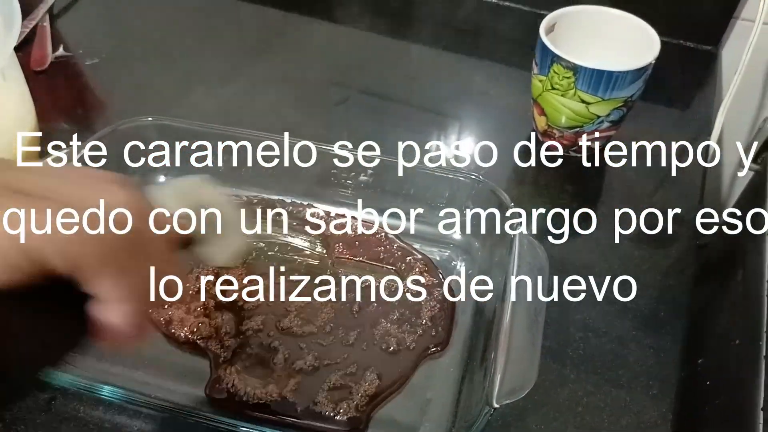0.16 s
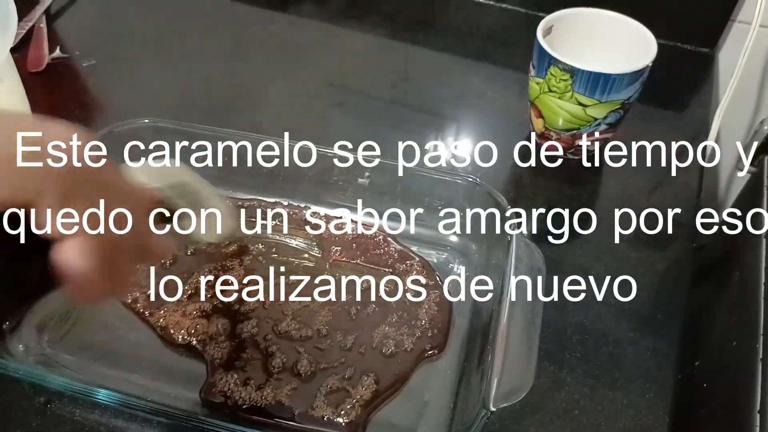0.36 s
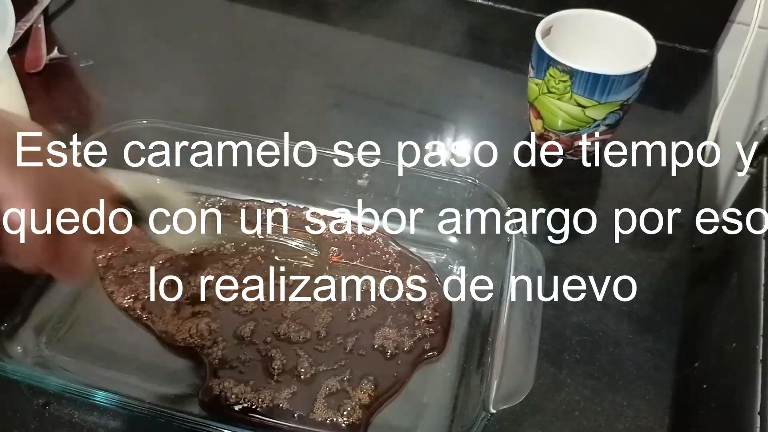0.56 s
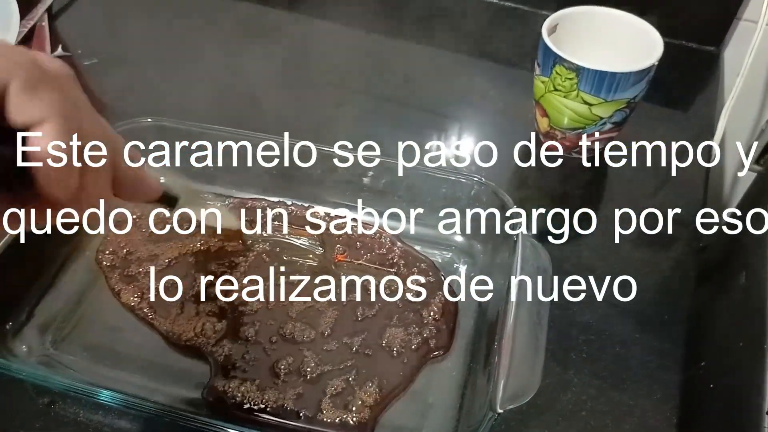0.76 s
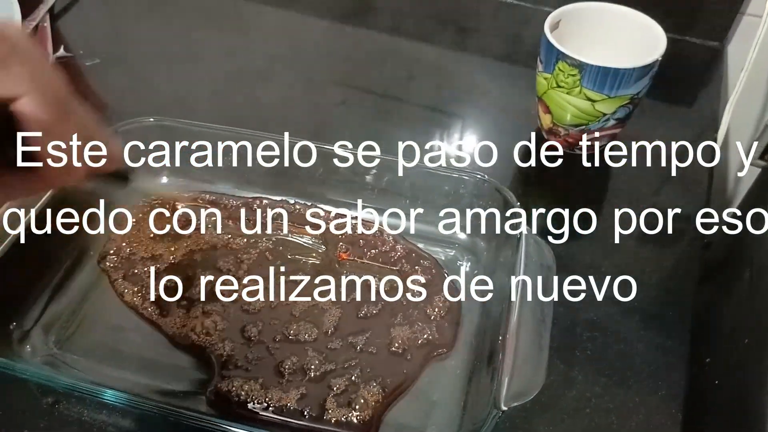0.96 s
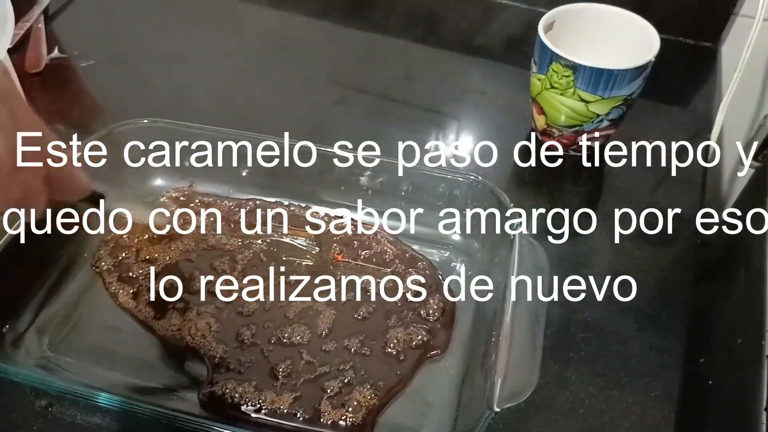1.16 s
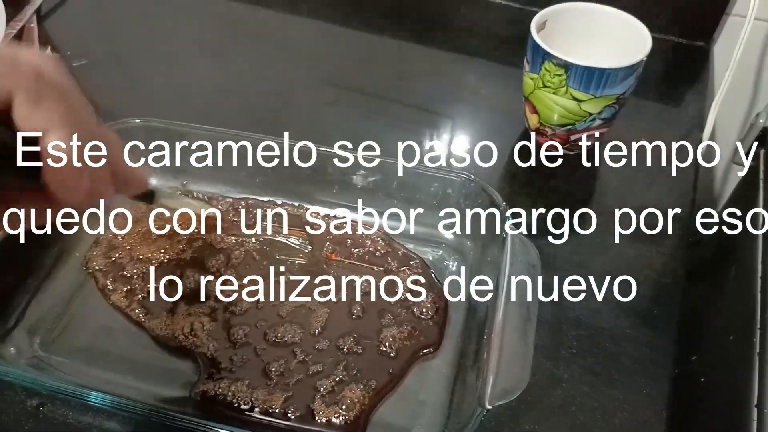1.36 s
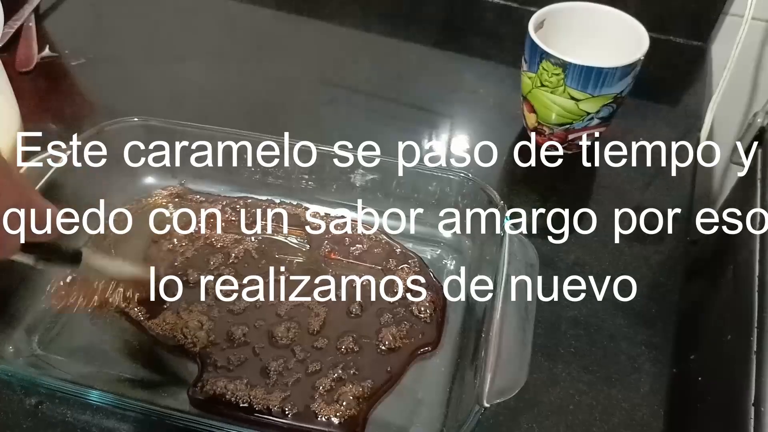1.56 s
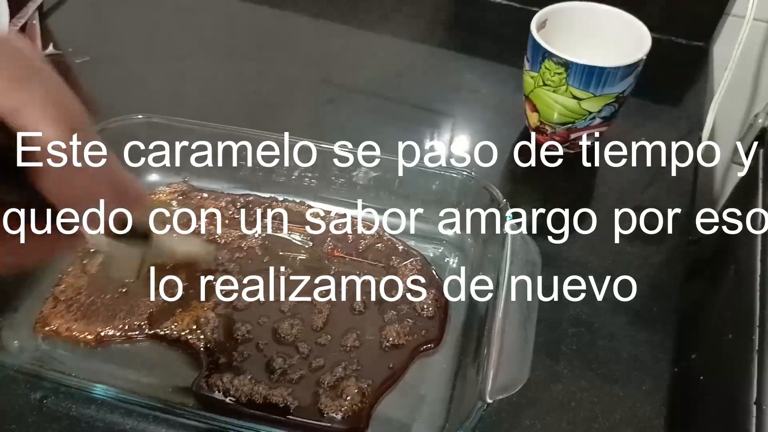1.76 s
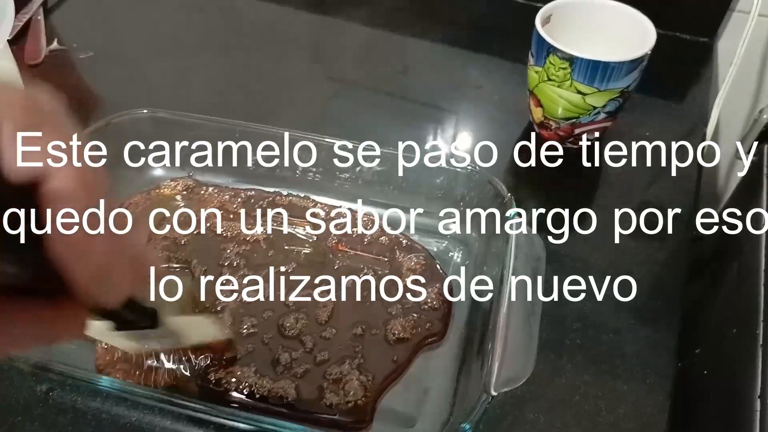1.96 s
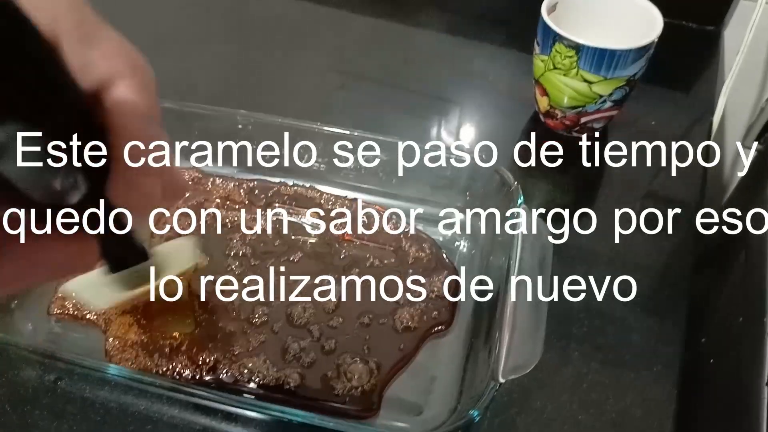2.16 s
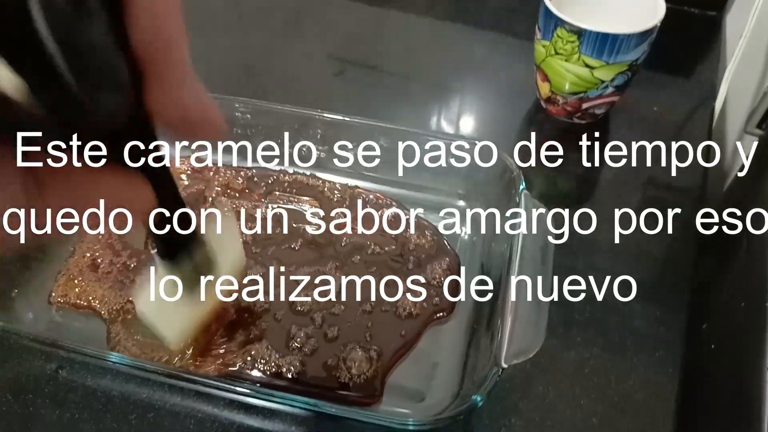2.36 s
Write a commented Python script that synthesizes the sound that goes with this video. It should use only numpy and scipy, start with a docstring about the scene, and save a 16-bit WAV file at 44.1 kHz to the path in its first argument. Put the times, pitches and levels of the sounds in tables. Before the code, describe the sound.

A spatula scrapes sticky, setting caramel in a glass dish. A gritty stroke rises from 0.15 s into one hard, booming worktop knock at 0.24 s, its ring dying in a tiled kitchen. Light rubbing follows, then strokes with crackles and faint glassy squeaks at 0.85-1.2 s, a brief one at 1.41 s, the strongest crackling scrape at 1.5-1.65 s, and softer scrapes near 2.0 and 2.33 s. Low fridge hum; close phone microphone.

```python
"""A spatula scrapes through setting, sticky caramel in a glass dish: friction hiss with grains of stick and slip.
The rubbed dish sings in narrow unsteady tones; cracking caramel ticks as short damped rings with noise snaps.
One hard knock on the worktop sums a crack, ringing modes and the boom of a tiled kitchen.
A fridge hums as wavering sines over faint room air, which is shaped noise.
The phone's noise suppressor ducks each band that sinks near its background."""
import sys
import numpy as np
from scipy import signal
from scipy.fft import rfft, irfft, next_fast_len
from scipy.io import wavfile
from scipy.ndimage import uniform_filter1d, map_coordinates

SR = 44100
rng = np.random.default_rng(int(sys.argv[2]) if len(sys.argv) > 2 else 0)


def bounce(signal):
    """Save signal as a 16-bit WAV file at the path given by the first command-line argument."""
    frames = np.transpose(np.atleast_2d(signal))
    limited = np.clip(frames, -1, 1)
    pcm = np.round(limited * 32767).astype(np.int16)
    wavfile.write(sys.argv[1], SR, pcm)


def gain_from_db(level_db):
    """Convert decibel levels to linear amplitude factors (20 dB per decade)."""
    decades = np.asarray(level_db, float) / 20
    return 10 ** decades


N = 110250
STFT = dict(fs=SR, nperseg=1024, noverlap=768)


def unit(x):
    """Scales to rms 1."""
    return x / np.sqrt(np.mean(x ** 2) + 1e-20)


def along(points, hz):
    """Interpolates (frequency [Hz], value) points on a log frequency axis."""
    point_hz, value = np.transpose(points)
    return np.interp(np.log(hz + 1), np.log(point_hz + 1), value)


def curves(rows):
    """One value per sample for each column after the time."""
    time_s, *columns = np.transpose(rows)
    return [np.interp(np.arange(N) / SR, time_s, column) for column in columns]


def wobble(knots_per_s):
    """Smooth random curve through Gaussian knots."""
    knots = rng.standard_normal(int(N * knots_per_s / SR) + 4)
    return map_coordinates(knots, [np.arange(N) * knots_per_s / SR])


def noise_band_limit(x, kind_order, hz):
    """Butterworth high-pass of the given order."""
    return signal.sosfilt(signal.butter(kind_order, hz, 'high', fs=SR, output='sos'), x)


def filtered(x, response):
    """Multiplies the spectrum by a response of frequency."""
    m = next_fast_len(len(x) + SR // 2)
    return irfft(rfft(x, m) * response(np.fft.rfftfreq(m, 1 / SR)), m)[:len(x)]


def coloured(x, spectrum):
    """Filters through (frequency [Hz], level [dB]) points."""
    return filtered(x, lambda hz: gain_from_db(along(spectrum, hz)))


def add(out, start_s, x):
    """Mixes x in at a time, cut at the end of out."""
    part = out[round(start_s * SR):][:len(x)]
    part += x[:len(part)]


# scraping strokes: (time [s], level [dB], treble level [dB], low edge [Hz])
STROKES = [(0, -66, -60, 2000), (.07, -54.5, -60.5, 1700), (.1, -80, -68, 2300), (.145, -68, -65.5, 2300),
           (.157, -44, -46.5, 1900), (.21, -38.5, -45, 1400), (.236, -44, -47.5, 1200),
           (.3, -58, -64.5, 1900), (.65, -59.5, -64, 2100), (.835, -63.5, -68, 2300),
           (.843, -62, -54, 1750), (.9, -46, -63.5, 1700), (.97, -52.5, -48.5, 1500),
           (1.05, -47.5, -57, 1300), (1.121, -58, -68, 1500), (1.126, -43, -57, 1200),
           (1.17, -45.5, -52.5, 1400), (1.25, -57, -63.5, 2000), (1.41, -63.5, -69.5, 2300),
           (1.414, -48, -47, 1600), (1.445, -64, -63.5, 1900), (1.497, -54.5, -66, 900),
           (1.515, -42, -45, 800), (1.525, -38, -38, 700), (1.6, -39, -38, 550), (1.66, -49, -48.5, 600),
           (1.75, -52.5, -65, 1692), (1.84, -62, -64, 2200), (1.87, -54.5, -62, 2000),
           (1.95, -57, -62.5, 2000), (1.975, -47, -47, 1300), (2.05, -49, -53.5, 1400),
           (2.1, -58.5, -67.5, 2000), (2.322, -66, -64.5, 2100), (2.33, -53, -57, 1500),
           (2.42, -67.5, -67, 1100), (2.5, -70, -80, 1200)]
# friction spectrum, main part: (frequency [Hz], relative level [dB])
RUB_BODY = [(600, 4.5), (1450, 0.5), (2000, -6), (2600, 4), (3130, 2), (4600, -6.5), (6320, -6.5),
            (8500, -25.5)]
# friction spectrum, treble part: (frequency [Hz], relative level [dB])
RUB_TREBLE = [(7000, -20), (10000, -11.5), (13500, -8), (15100, 6), (16000, -16), (16300, -32.5)]
# dish resonances: (frequency [Hz], width [Hz], relative level [dB])
DISH_MODES = [(1760, 120, 3), (2194, 75, 2.5), (3350, 300, -17)]
DISH_DB = 2  # added to every dish resonance
GRAINS_PER_S, GRAIN_SPREAD_DB, GRAIN_T60_S, GRAIN_DB = 510, 3.5, 0.003, -2.5
STREAK_DB = 4.5


def dish_response(hz):
    """Direct path plus the band-pass resonances of the glass."""
    modes = sum(gain_from_db(db) * 1j * hz * width_hz / (mode_hz ** 2 - hz ** 2 + 1j * hz * width_hz)
                for mode_hz, width_hz, db in DISH_MODES)
    return 1 + gain_from_db(DISH_DB) * modes


def stick_slip_grains():
    """Noise bursts at random times: sticking and letting go."""
    size = gain_from_db(GRAIN_SPREAD_DB * np.clip(rng.standard_normal(N), -2, 2))
    hits = size * (rng.random(N) < GRAINS_PER_S / SR)
    decay = gain_from_db(-60 * np.arange(300) / SR / GRAIN_T60_S)
    return signal.fftconvolve(hits, decay)[:N] * rng.standard_normal(N)


def scraping():
    """Stick-slip grains over streaky friction hiss, through the dish, with a moving low edge."""
    level_db, treble_db, low_hz = curves(STROKES)
    rub = rng.standard_normal(N) + gain_from_db(GRAIN_DB) * unit(stick_slip_grains())
    rub = rub * gain_from_db(1.5 * wobble(39.89))
    hz, t, z = signal.stft(filtered(coloured(rub, RUB_BODY), dish_response), **STFT)
    streaks = uniform_filter1d(rng.standard_normal(z.shape), size=5, axis=0)
    streaks = unit(uniform_filter1d(streaks, size=6, axis=1))
    edge_hz = np.interp(t, np.arange(N) / SR, low_hz)
    low_cut = 1 + (edge_hz / (hz[:, None] + 1)) ** 8
    body = unit(signal.istft(z * gain_from_db(STREAK_DB * streaks) / low_cut, **STFT)[1][:N])
    return gain_from_db(level_db) * body + gain_from_db(treble_db) * unit(coloured(rub, RUB_TREBLE))


# dish tones: (start [s], length [s], pitch [Hz], level [dB], quiver rate [knots/s])
DISH_TONES = [(0.851, 0.11, 1746, -56.5, 109.2), (0.918, 0.16, 620, -49.5, 69.94),
              (1.01, .16, 665, -51, 117.8), (1.185, 0.2, 624, -58.5, 100.1), (1.428, 0.17, 608, -61, 91),
              (2.349, 0.15, 605, -61, 90), (2.429, 0.069, 325, -57.5, 60.3),
              (1.314, 0.12, 1560, -70.5, 39.1), (1.693, 0.24, 1485, -68, 120.1),
              (1.969, 0.091, 986, -64, 139.4), (1.973, 0.16, 1518, -66.5, 150.3),
              (2.158, 0.19, 2090, -67.5, 70.1), (0.446, 0.26, 2890, -57.5, 130.9),
              (0.506, 0.31, 2393, -60.5, 197.3), (0.604, 0.14, 1680, -71, 100.2)]
SING_STEADY, SING_EDGE_S, SING_FADE = 0.4, 0.012, 0.3  # steady part, rise, faded share of length
SING_DRIFT_HZ, SING_DRIFT_KNOTS_PER_S = 14, 14


def singing():
    """Rubbed dish: narrow tones, random in amplitude and phase, swell and fade under the blade."""
    out, t = np.zeros(N), np.arange(N) / SR
    for start_s, length_s, hz, db, knots_per_s in DISH_TONES:
        quiver = wobble(knots_per_s) + 1j * wobble(knots_per_s)
        rise = (t - start_s) / SING_EDGE_S
        fade = (start_s + length_s - t) / (SING_FADE * length_s)
        shape = np.clip(np.minimum(rise, fade), 0, 1)
        cycles = np.cumsum(hz + SING_DRIFT_HZ * wobble(SING_DRIFT_KNOTS_PER_S)) / SR
        tone = np.imag((SING_STEADY + quiver) * np.exp(2j * np.pi * cycles))
        out += gain_from_db(db) * shape * unit(tone)
    return out


# kitchen decay: (frequency [Hz], t60 [s])
KITCHEN_T60 = [(150, 0.64), (560, 0.52), (1470, 0.6), (3880, 0.44), (10200, 0.5)]


def room_tail():
    """Fresh noise tail of energy 1, each frequency dying at its own speed."""
    hz, t, z = signal.stft(rng.standard_normal(SR * 3 // 4), SR, nperseg=256)
    decay = gain_from_db(-60 * t / along(KITCHEN_T60, hz)[:, None])
    tail = signal.istft(z * decay, SR, nperseg=256)[1]
    return tail / np.linalg.norm(tail)


# cracking caramel: (time [s], direct peak [dB], pitch [Hz])
CRACKLES = [(0.0638, -44.5, 3320), (0.1549, -34.5, 2400), (0.8526, -36, 3090), (0.881, -40, 3550),
            (0.9386, -28, 2230), (1.0523, -31, 1800), (1.1255, -32, 1800), (1.1443, -24, 3100),
            (1.4125, -46, 2900), (1.5265, -27, 2400), (1.5332, -24, 2500), (1.5495, -20, 1750),
            (1.5802, -23, 3600), (1.6248, -26, 3300), (1.6995, -37, 4300), (1.9428, -31, 3190),
            (2.143, -38, 2750), (2.2975, -48, 2070), (2.3292, -52, 2660)]
TICK_T60_S, SNAP_T60_S, SNAP_DB = 0.011, 0.0084, -5
TICK_ROOM_DB, TICK_ROOM_DELAY_S = -4, 0.003


def ticks():
    """Cracking caramel: short damped ring with a noise snap, answered by the room."""
    out, t = np.zeros(N), np.arange(1500) / SR
    for start_s, db, hz in CRACKLES:
        snap = rng.standard_normal(len(t)) * gain_from_db(-60 * t / SNAP_T60_S)
        snap = coloured(snap, RUB_BODY[1:] + RUB_TREBLE[1:])
        ring = np.sin(2 * np.pi * hz * t) * gain_from_db(-60 * t / TICK_T60_S)
        tick = noise_band_limit(ring + gain_from_db(SNAP_DB) * snap / np.abs(snap).max(), 4, 0.8 * hz)
        tick = gain_from_db(db) * tick / np.abs(tick).max()
        add(out, start_s, tick)
        answer = signal.fftconvolve(tick, room_tail())
        add(out, start_s + TICK_ROOM_DELAY_S, gain_from_db(TICK_ROOM_DB) * answer)
    return out


# worktop modes: (frequency [Hz], relative level [dB], t60 [s])
WORKTOP_MODES = [(187.1, -4, .56), (243, -11, 0.52), (393, -4, 0.33), (672, 11.5, 0.045), (646, -7, 0.61),
                 (735, -2.5, 0.3), (803, -4.5, .41), (1278, -6.5, 0.402), (1307.6, -5.5, 0.55),
                 (2783, 2.5, .03)]
# knock as the room returns it: (frequency [Hz], relative level [dB])
BOOM_SPECTRUM = [(60, -20.5), (100, -4), (170, -3.5), (310, -6.5), (495, -3.5), (721, -0.5), (1070, -15),
                 (1400, -13.5), (6380, -27.5), (8000, -37), (16300, -61)]
KNOCK_S, RING_DB, CRACK_DB, CRACK_T60_S, BOOM_DB = 0.2384, -18.5, -13.5, 0.0042, -16
SWELL_CYCLES_PER_S = 5  # mode rise, in cycles per second of its t60
BOOM_RISE_S, EARLY_DB, EARLY_T60_S = 0.0041, 4, 0.33  # first reflections stand over the tail


def worktop_ring(t):
    """Damped modes with wandering phase, each taking some cycles to swell."""
    ring = 0
    for hz, db, t60_s in WORKTOP_MODES:
        swell = 1 - np.exp(-t * hz / np.clip(SWELL_CYCLES_PER_S * t60_s, .1, 9))
        phase = 2 * np.pi * hz * t + 0.24 * wobble(15)[:len(t)]
        ring = ring + gain_from_db(db - 60 * t / t60_s) * np.sin(phase) * swell
    return ring


def room_boom(t):
    """Coloured room tail that fills in, with stronger early reflections."""
    boom = coloured(np.pad(room_tail(), (0, 999)), BOOM_SPECTRUM)[:len(t)]
    boom = boom * (1 - np.exp(-t / BOOM_RISE_S))
    boom = boom * (1 + gain_from_db(EARLY_DB - 60 * t / EARLY_T60_S))
    return boom / np.std(boom[:SR // 20])


def knock():
    """Hard impact: noise crack, ringing worktop and room boom, high-passed at 70 Hz."""
    out, t = np.zeros(N), np.arange(SR * 3 // 4) / SR
    ring = gain_from_db(RING_DB) * worktop_ring(t)
    crack = coloured(rng.standard_normal(len(t)), [(300, -13.0), (1500, -4), (6400, 3.5), (8000, -25.0)])
    crack = gain_from_db(CRACK_DB - 60 * t / CRACK_T60_S) * unit(crack)
    add(out, KNOCK_S, ring + crack + gain_from_db(BOOM_DB) * room_boom(t))
    return noise_band_limit(out, 2, 70)


# fridge hum: (frequency [Hz], mean rms level [dB])
FRIDGE_HUM = [(43.1, -80), (59.2, -56.5)]
HUM_WAVER_DB, HUM_WAVER_RAD = 0.1, 0.2135


def fridge():
    """Steady sines, slightly unsteady in level and phase."""
    t, hum = np.arange(N) / SR, np.zeros(N)
    for hz, db in FRIDGE_HUM:
        level = np.sqrt(2) * gain_from_db(db + HUM_WAVER_DB * wobble(4.3))
        hum += level * np.sin(2 * np.pi * hz * t + HUM_WAVER_RAD * wobble(4.1))
    return hum


# room air spectrum: (frequency [Hz], relative level [dB])
AIR_SPECTRUM = [(40, -13), (110, -0.5), (250, -9), (700, -15), (1500, -20), (2100, -24), (2600, -29),
                (4560, -29.5), (7840, -45.5), (12000, -47), (15500, -32), (16300, -48)]
AIR_DB, AIR_WAVER_DB = -61, 0.47


def room_air():
    """Shaped noise with a slowly wavering level."""
    air = unit(coloured(rng.standard_normal(N), AIR_SPECTRUM))
    return gain_from_db(AIR_DB + AIR_WAVER_DB * wobble(0.73)) * air


def scene():
    """Sums all sources into one channel."""
    return (scraping() + singing() + ticks() + knock() + fridge() + room_air())[None]


# suppressor threshold: (frequency [Hz], level [dB per bin])
GATE_THRESHOLD = [(150, -57.5), (600, -77.5), (1300, -77.5), (2500, -94.5)]
GATE_DEPTH_DB, GATE_FROM_HZ = -13, 120


def suppressed(mono):
    """Noise suppressor: turns down bands whose smoothed power falls under the threshold."""
    hz, _, z = signal.stft(mono, **STFT)
    power = uniform_filter1d(np.abs(z) ** 2, size=5, axis=0)
    power = uniform_filter1d(power, size=5, axis=1)
    ratio = np.abs(power) / gain_from_db(along(GATE_THRESHOLD, hz))[:, None] ** 2
    gain = np.where(hz[:, None] < GATE_FROM_HZ, 1, gain_from_db(GATE_DEPTH_DB / (1 + ratio ** 2)))
    return signal.istft(z * gain, **STFT)[1][None, :N]


def top_cut(x):
    """Nothing passes above the cut-off."""
    return signal.sosfilt(signal.butter(12, 16820, fs=SR, output="sos"), x)


def record(dry):
    """The phone: suppresses noise and returns the finished mix."""
    mix = suppressed(dry[0])
    return top_cut(mix)


dry = scene()
out = record(dry)
bounce(out)
```